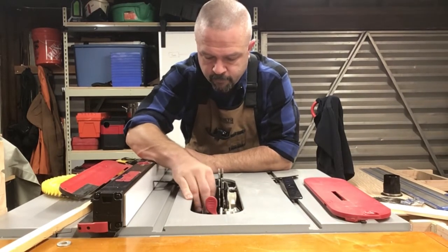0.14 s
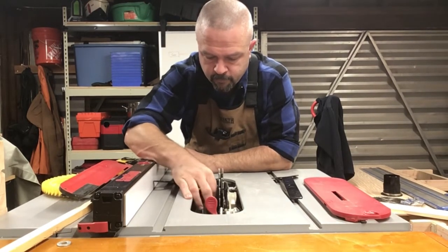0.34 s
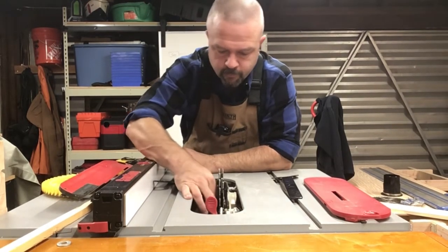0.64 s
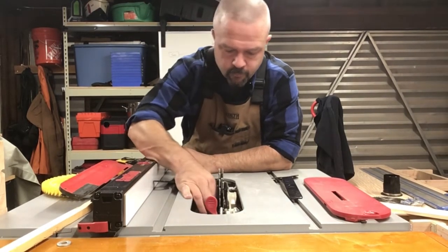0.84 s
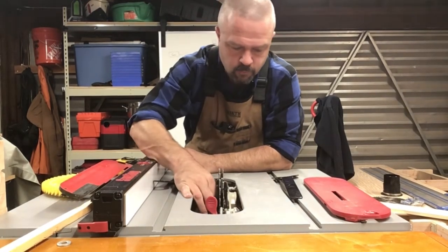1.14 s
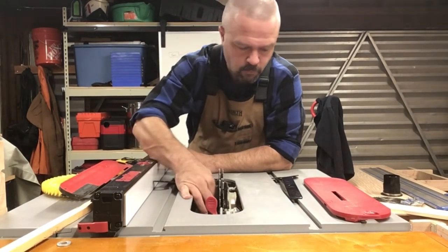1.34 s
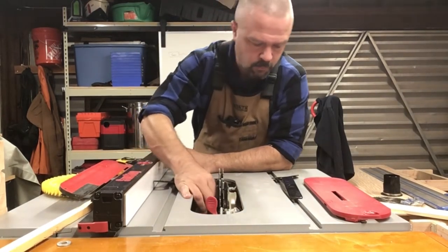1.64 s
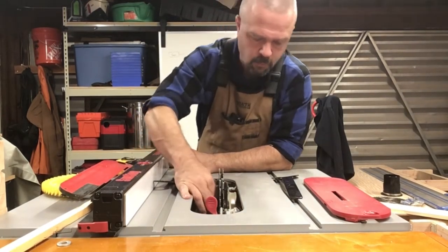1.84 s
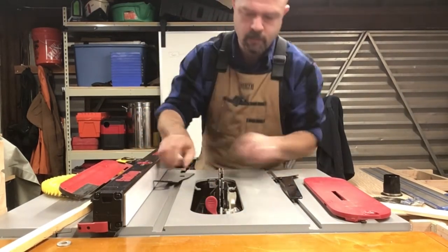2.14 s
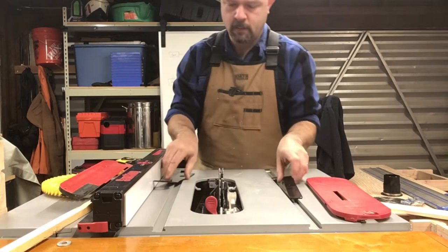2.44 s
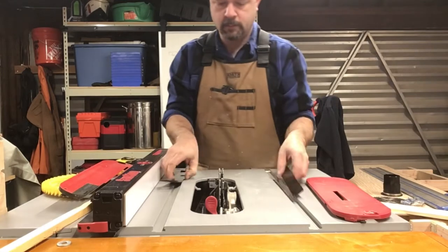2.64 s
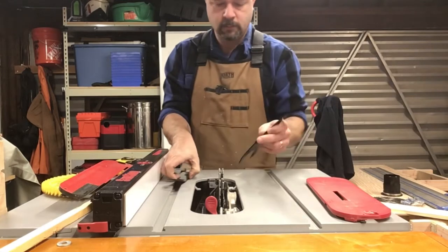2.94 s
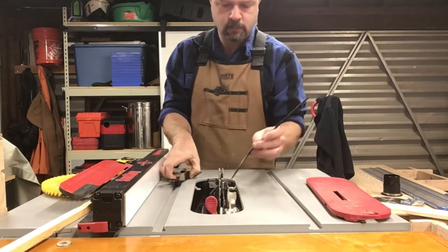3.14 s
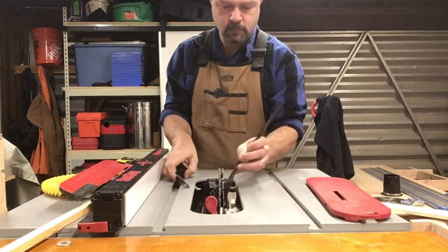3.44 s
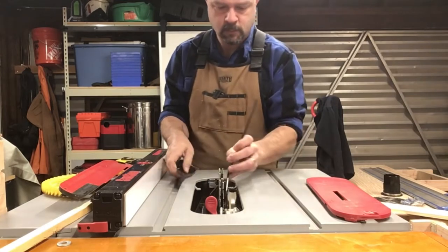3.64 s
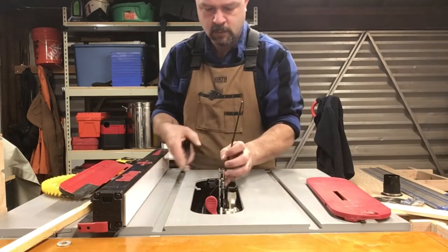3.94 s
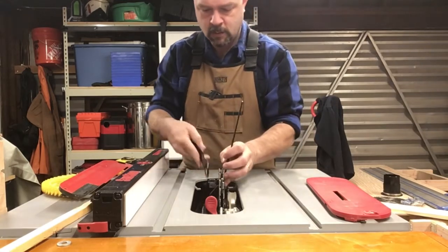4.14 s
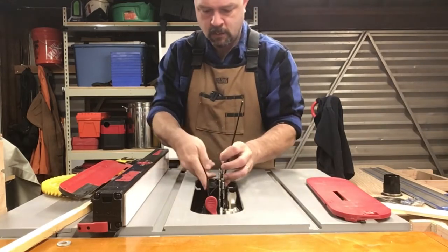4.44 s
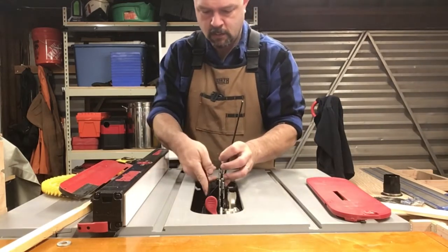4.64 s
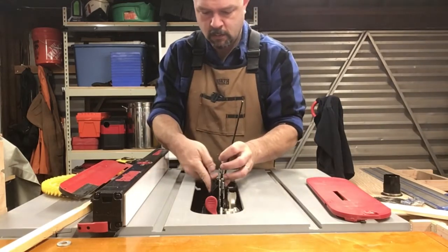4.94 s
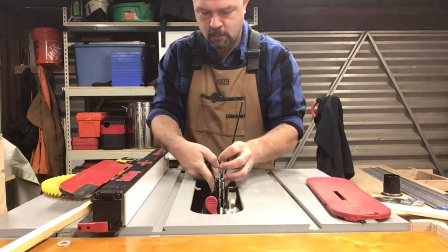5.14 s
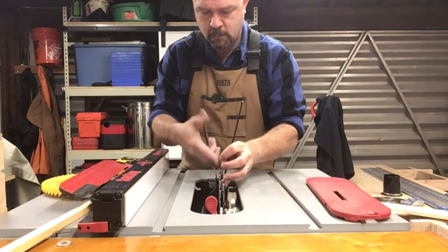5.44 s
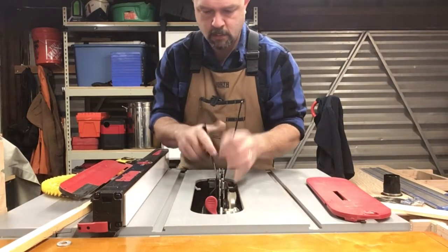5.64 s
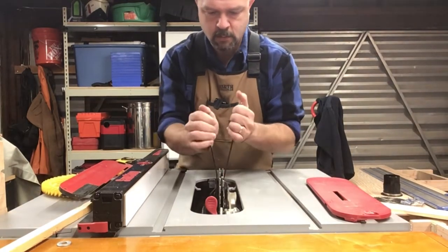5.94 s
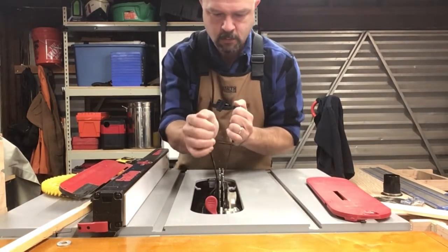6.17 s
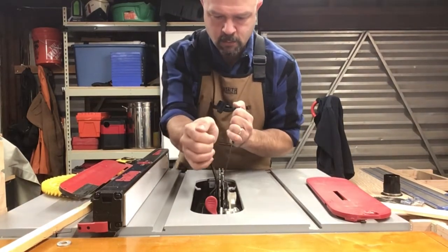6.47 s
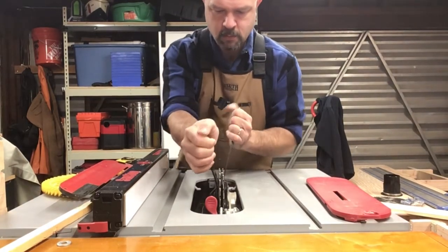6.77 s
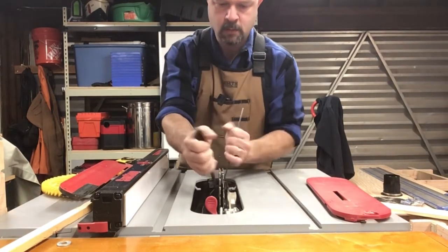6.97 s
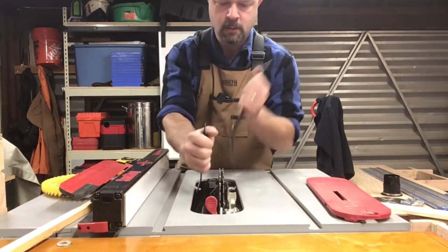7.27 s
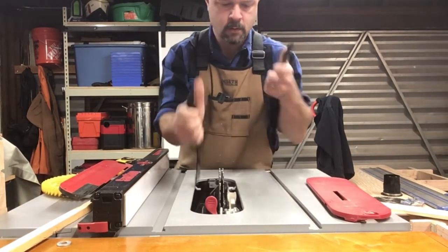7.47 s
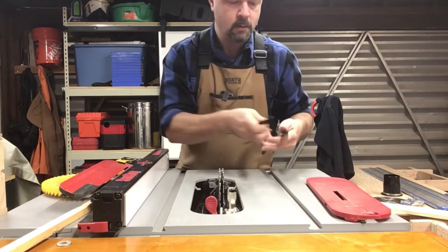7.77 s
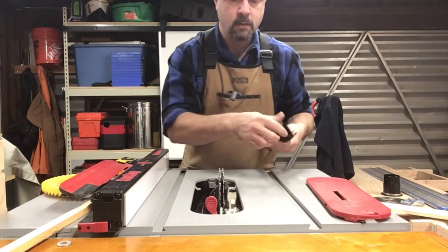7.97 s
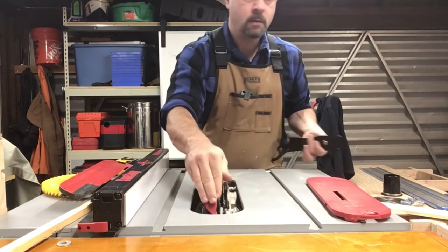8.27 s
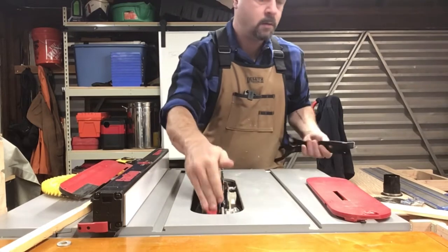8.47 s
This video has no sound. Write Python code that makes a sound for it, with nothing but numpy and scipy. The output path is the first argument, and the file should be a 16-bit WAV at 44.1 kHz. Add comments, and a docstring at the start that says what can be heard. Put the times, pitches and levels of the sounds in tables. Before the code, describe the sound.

Close in a small workshop, hands turn a nut almost silently, with faint clinks and dull taps. Two flat wrenches are then slid off the metal table with knocks and scrapes, and clank hard against the nut, blades and each other. A quieter stretch of pushing and taps brings sharp pops, then more bright clinks as the wrenches are gathered in one hand. Short room echo, low room tone.

```python
"""A small workshop, close to the microphone: hands flick and turn a nut on a saw arbor, with light clinks and dull taps;
from about two seconds two flat steel wrenches are dragged off the table top, then clink on the nut, the blades and
each other, and at the end are gathered in one hand. Sharp pops break in, skin and cloth rub, the room answers.
Bars ring as sums of bending modes; taps, drags and rubbing are shaped noise; pops are short pressure steps."""
import sys
import numpy as np
from scipy import signal
from scipy.fft import rfft, irfft, next_fast_len
from scipy.io import wavfile
from scipy.ndimage import uniform_filter1d, minimum_filter1d

SR = 44100
rng = np.random.default_rng(int(sys.argv[2]) if len(sys.argv) > 2 else 0)


def dump(signal):
    """Clip the signal to [-1, 1] and save it as 16-bit WAV at the path in sys.argv[1]."""
    limited = np.clip(np.atleast_2d(signal).T, -1, 1)
    pcm = np.round(limited * 32767).astype(np.int16)
    wavfile.write(sys.argv[1], SR, pcm)


N = 379701

# resonances of the table top and cabinet: centre_hz, width_hz, level_db
TABLE_MODES = [(141, 70.6, 4), (188.3, 72.7, 4.5), (301, 55, -1.5), (449.5, 101, 2.5), (776, 270, -5.5),
               (1011, 130, -0.5), (1280, 150, 0), (1560, 140, -5.5), (2153, 450, -9.5)]
# bending modes of the long wrench: mode_hz, level_db, t60_s (before strike, chance and grip)
LONG_WRENCH = [(1418, -10, 0.16), (1558, -7, 0.14), (2240, -7, 0.12), (3254, 1.5, 0.11), (4430, -0.5, 0.12),
               (5377, -2, 0.14), (5760, 6.5, 0.099), (6340, -20.5, 0.2), (6820, 9, 0.047),
               (7240, -7.5, 0.1), (7650, 1.5, 0.16), (8710, -1.5, 0.14), (8560, -3, 0.052),
               (9200, -13.5, 0.078), (10130, -5.5, 0.14), (12100, -4.5, 0.22)]
# bending modes of the short wrench: mode_hz, level_db, t60_s (before strike, chance and grip)
SHORT_WRENCH = [(1135, -18, 0.24), (1918, -7.5, 0.097), (2389, -1.5, 0.074), (2803, -2.5, 0.096),
                (2939, -1.5, 0.045), (3884, -1, 0.086), (5124, -1, 0.11), (5270, 1, 0.042),
                (6245, 10.5, 0.053), (6680, -7, 0.15), (7460, -2.5, 0.088), (8100, -7.5, 0.18),
                (8870, -7, 0.13), (9800, -13.5, 0.069), (10900, -14, 0.27), (11100, -16, 0.12),
                (12770, -15.5, 0.12)]


def amp(db):
    """Decibels to gain."""
    return 10 ** (np.asarray(db) / 20)


def unit(x):
    """Scales a sound to rms 1."""
    return x / np.sqrt(np.mean(x ** 2) + 1e-20)


def along(points, hz):
    """Reads a curve of (Hz, value) points on a log frequency axis."""
    point_hz, value = np.transpose(points)
    return np.interp(np.log(hz + 1), np.log(point_hz + 1), value)


def filtered(x, response):
    """Multiplies the spectrum of x by a response that is a function of frequency."""
    size = next_fast_len(len(x) + 8192)
    hz = np.fft.rfftfreq(size, 1 / SR)
    return irfft(rfft(x, size) * response(hz), size)[:len(x)]


def resonant(hz, peaks):
    """Causal response of (centre Hz, width Hz, dB) resonances, summed with alternating sign."""
    total = 0
    for k, (centre, width, db) in enumerate(peaks):
        band = 1j * hz * width / (centre * centre - hz * hz + 1j * hz * width)
        total = total + (-1) ** k * amp(db) * band
    return total


def gritty(grit_db, size):
    """White noise whose strength jumps from grain to grain, each grain size samples long."""
    strength = np.minimum(rng.exponential(size=N // size + 1), 2)
    grains = np.repeat(strength, size)[:N]
    return rng.standard_normal(N) * amp(grit_db * grains)


def add(track, start_s, sound):
    """Lays a sound on the track at its start time."""
    part = track[round(start_s * SR):][:len(sound)]
    part += sound[:len(part)]


def levels(rows):
    """One gain per sample for each dB column of a curve over time."""
    point_s, *columns = np.transpose(rows)
    return [amp(np.interp(np.arange(N) / SR, point_s, column)) for column in columns]


def strokes(starts, holds, dbs, rise, fall):
    """Gain of a set of strokes: each swells to its level, holds and fades, at steady dB per second."""
    t = np.arange(0, N + 64, 64) / SR
    ends = starts + np.abs(holds)
    before = np.maximum(starts[:, None] - t, 0)
    after = np.maximum(t - ends[:, None], 0)
    shape_db = dbs[:, None] - rise * before - fall * after
    return np.interp(np.arange(N) / SR, t, np.linalg.norm(amp(shape_db), axis=0))


def wrenches():
    """Each contact rings both wrenches, rattles the blade stack and shakes the table."""
    # steel on steel: start_s, long_db, long strike point (0-.5), short_db, short strike point (0-.5),
    # contact hardness (octaves from 4 kHz), ring time factor (at least .1 is used), rattle_db, thud_db,
    # the two modes that the grip leaves free: one_hz, other_hz, and how far they stand out: lift_db
    clink_rows = [(0.074, -32.5, 0.33, -38, .099, -1.56, 1, -39.5, -39, 1420, 2925, 2),
                  (0.419, -60, .23, -41, 0.081, -1.57, 0.6, -47, -42.5, 2350, 6530, 10),
                  (2.068, -52, .27, -36, 0.22, -2, 0.66, -40.5, -39.5, 2750, 2810, 5),
                  (3.256, -46.5, 0.058, -49, 0.45, -0.6, 1, -55, -17.5, 2260, 2290, 12.5),
                  (3.314, -28.5, 0.026, -32, .03, -1.56, 0.89, -39, -17, 3877, 2270, 8.5),
                  (3.366, -18.5, .041, -10, 0.049, -2, 0.53, -21.5, -21, 1140, 1410, 6.5),
                  (3.38, -29.5, 0.082, -32.5, .016, -0.3, 0.94, -29.5, -22, 5760, 3316, 4),
                  (3.544, -29, .35, -30.5, 0.38, -0.26, 0.94, -35, -30, 1920, 5630, 9.5),
                  (3.567, -42, .023, -36, 0.31, -0.34, 0.72, -30.5, -33, 1890, 4430, 5.5),
                  (3.63, -35, 0.16, -50.5, 0.34, -2.5, .99, -65, -61, 1400, 1897, 9.5),
                  (3.72, -12.5, .11, -15.5, 0.32, 0.03, 0.92, -8.5, -12.5, 2280, 1400, 9.5),
                  (4.361, -32, .059, -14.5, 0.032, 0.3, 0.5, -26, -38, 2860, 5080, 5.5),
                  (4.555, -39, 0.074, -32.5, .19, -1.27, 1, -40, -45.5, 2920, 6230, 5.5),
                  (4.59, -42, 0.065, -33.5, .19, -1.2, 0.81, -52.5, -48, 1540, 5160, 4.5),
                  (4.694, -18, 0.075, -14.5, 0.18, -0.34, 0.5, -32, -48.5, 2950, 2892, 4.5),
                  (4.703, -15.5, 0.099, -3, 0.2, -1.7, 0.8, -27, -21.5, 2800, 3390, 5),
                  (4.72, -23, .36, 0, 0.19, -0.6, 0.46, -13.5, -22, 5240, 2760, 5),
                  (4.731, -15.5, .48, -3.5, .17, -0.3, .3, -16.5, -14.5, 5110, 2835, 4.5),
                  (4.807, -36.5, .19, -8.5, .18, -0.78, .48, -23.5, -23.5, 2950, 2820, 4),
                  (4.867, -33.5, .035, -23.5, .2, -1.05, 0.48, -44, -23.5, 2892, 2820, 5),
                  (4.904, -12, .3, -4.5, .14, -0.44, 0.66, -11.5, -19, 3752, 7350, 9.5),
                  (6.885, -61, 0.062, -46, 0.021, -1.05, 0.79, -55, -35.5, 2840, 1907, 5.5),
                  (6.913, -28, 0.42, -28.5, 0.03, -1.85, 0.93, -37, -25.5, 1910, 1570, 8),
                  (6.944, -14, .22, -24.5, 0.091, 0.46, 0.64, -18.5, -27, 3270, 5470, 2),
                  (6.959, -33.5, .23, -45.5, .058, 2, 0.82, -47, -25.5, 10300, 7650, 12),
                  (7.113, -48, 0.415, -31.5, 0.03, -0.8, 0.63, -36, -43, 1890, 3220, 7.5),
                  (7.38, -24, 0.043, -7.5, 0.039, -1.25, 0.91, -14, -24, 1900, 6130, 5),
                  (7.841, -17, 0.4, -19, 0.27, -0.49, 1, -35, -36.5, 1555, 8870, 6),
                  (7.867, -17.5, 0.37, -26, 0.21, -1.06, 1, -44, -41, 4420, 2810, 6.5),
                  (7.898, -32, .27, -38, .02, -0.5, 0.86, -18, -36, 6785, 2330, 15),
                  (7.904, -26, 0.098, -22, .17, .74, 0.66, -18.5, -27.5, 5240, 2870, 10),
                  (8.11, -33, .046, -19.5, 0.037, -1.44, 0.71, -25, -21, 2322, 2860, 8.5),
                  (8.211, -23, .22, -21, 0.072, 0.6, 1, -19, -31.5, 1896, 5120, 15),
                  (8.3, -18, .38, -20.5, 0.15, -0.84, 0.64, -26, -36, 3300, 6060, 9.5),
                  (8.366, -36, 0.26, -33, .35, -0.6, 1, -29.5, -55, 2312, 5020, 20),
                  (8.445, -20, .27, -17, .28, -0.3, 1, -25, -33.5, 8560, 5040, 8),
                  (8.491, -47, .022, -28, 0.12, -0.3, 1, -47, -30.5, 4900, 3330, 5),
                  (8.598, -31, .046, -27, .046, -2.1, .9, -31.5, -22.5, 2400, 2310, 13)]
    # colour of the rattling blade stack: point_hz, level_db per Hz (relative)
    clatter_colour = [(180, -28.5), (300, 4), (789, -5.5), (1080, -5), (4120, -1.5), (5200, -1.5),
                      (8860, -10), (15100, -28.5), (16200, -49.5)]
    contact_ms, softer_longer = 1.7, 0.39  # rise at 4 kHz hardness; octaves longer per octave softer
    out, t = np.zeros(N), np.arange(SR // 4) / SR
    for (start_s, long_db, long_at, short_db, short_at, octaves, factor, rattle_db, thud_db,
         one_hz, other_hz, lift_db) in clink_rows:
        centre_hz = 4000 * 2 ** octaves
        grip = [one_hz, lift_db, other_hz, lift_db]

        def contact(hz):
            """A harder contact moves the band of excitation up in frequency."""
            bell = 1 / (1 + (1.094 * np.log((hz + 1) / centre_hz)) ** 2)
            return bell / (1 + (hz / (4.4 * centre_hz)) ** 2)

        bars = amp(long_db) * ring(LONG_WRENCH, t, long_at, factor, contact, grip)
        bars += amp(short_db) * ring(SHORT_WRENCH, t, short_at, factor, contact, grip)
        noise = rng.standard_normal(len(t))
        rattle = unit(filtered(noise, lambda hz: amp(along(clatter_colour, hz)) * contact(hz) ** 0.76))
        # a long weak tail and a short strong burst
        rattle_fade = 0.69 * amp(-60 * t / (0.19 * max(factor, .1))) + 4.07 * amp(-60 * t / 0.013)
        rattle = amp(rattle_db) * rattle * rattle_fade
        rise = 1 - np.exp(-t * 1000 / (contact_ms * 2 ** (-softer_longer * octaves)))
        add(out, start_s, rise * (bars + rattle) + amp(thud_db) * thud(t, t60=0.093))
    return out


def ring(modes, t, point, factor, contact, grip):
    """A flat bar: the strike point sets each mode's drive; the grip sets ring time but favours two modes."""
    hz, db, t60 = np.transpose(modes)[:, :, None]
    number = np.arange(1, len(modes) + 1)[:, None]
    drive = np.abs(np.cos(np.pi * number * point)) + .1
    lift_db = 0
    for free_hz, lift in np.reshape(grip, (2, 2)):
        lift_db = lift_db + lift * np.exp(-(np.log(hz / free_hz) / 0.045) ** 2)
    life = t60 * max(factor, .1) * amp(0.43 * lift_db)
    chance = rng.standard_normal((len(modes), 6))
    # a faint second decay lasts three times as long
    fade = amp(db + lift_db + chance[:, :1]) * (amp(-60 * t / life) + 0.026 * amp(-60 * t / (3 * life)))
    # twin modes beat
    beat = 1 + 0.79 * np.cos(2 * np.pi * (45 * chance[:, 2:3] * t + chance[:, 3:4]))
    # loose contact blurs each line
    beat += 0.67 * np.cos(2 * np.pi * (130 * chance[:, 4:5] * t + chance[:, 5:]))
    tone = np.sin(2 * np.pi * (hz * t + chance[:, 1:2]))
    return np.sum(drive * contact(hz) * fade * beat * tone, axis=0)


def thud(t, t60):
    """A short push into the table and cabinet: a decaying noise burst through their resonances, peak 1."""
    push = rng.standard_normal(len(t)) * amp(-60 * t / t60)
    body = filtered(push, lambda hz: resonant(hz, TABLE_MODES) / (1 + 1j * hz / 700))
    return body / np.abs(body).max()


def dragging():
    """Sliding steel grates in the table's resonances, with wrench modes singing in the bright part."""
    # steel dragged over the table top: start_s, hold_s, level_db, brightness_db (relative to level_db)
    drag_rows = [(1.994, .05, -63, -10), (2.074, 0.083, -44.5, -9), (2.158, 0.077, -53, -9),
                 (2.246, 0.04, -38.5, -2.5), (2.343, .07, -51, -18), (2.438, 0.025, -40, -1.5),
                 (2.543, 0.015, -31, -9.5), (2.626, 0.0078, -37.5, -5), (2.681, 0.082, -44, -8.5),
                 (2.857, .01, -39, -8.5), (2.961, 0.027, -41, -4), (3.044, 0.0058, -48.5, -21),
                 (3.282, .1, -26, -5), (3.375, 0.094, -30, -2.5), (3.55, 0.02, -44.5, -9.5),
                 (3.635, 0.1, -53.5, -7), (4.555, .04, -46, -7.5), (4.689, .005, -45.5, 3),
                 (4.723, .03, -38, -10), (4.815, .01, -34, -12.5), (4.868, 0.026, -35, -7),
                 (5.303, 0.032, -56.5, -7.5), (5.49, .005, -59, 3), (5.593, .005, -48, 2),
                 (5.749, .03, -52.5, -13), (5.821, 0.059, -56.5, -4.5), (6.893, 0.023, -48, -13),
                 (6.94, 0.0099, -34, -2), (7.131, 0.023, -40, -14.5)]
    rise, fall = 601, 302  # dB per second
    start_s, hold_s, db, bright_db = np.transpose(drag_rows)
    dull_gain = strokes(start_s, hold_s, db, rise, fall)
    bright_gain = strokes(start_s, hold_s, db + bright_db, rise, fall)

    def dull_colour(hz):
        """Low table resonances."""
        return resonant(hz, TABLE_MODES[2:5]) * hz / (hz + 200) / (1 + (hz / 1500) ** 2)

    def bright_colour(hz):
        """High table resonances."""
        return resonant(hz, TABLE_MODES[5:]) * hz / (hz + 900) / (1 + (hz / 3500) ** 2)

    dull = unit(filtered(gritty(3.7, size=300), dull_colour))
    bright = unit(filtered(gritty(2.4, size=200), bright_colour))
    # wrench modes as resonances 35 Hz wide
    narrow = [(hz, 35, level) for hz, level, _ in LONG_WRENCH[2:7] + SHORT_WRENCH[3:7]]
    sing = unit(filtered(gritty(3.3, size=400), lambda hz: resonant(hz, narrow) / (1 + (hz / 2400) ** 2)))
    return dull_gain * dull + bright_gain * (bright + amp(-11) * sing)


def taps():
    """A puff of noise around its pitch over a thud, with no ring, led by a bright tick."""
    # dull taps and ticks of hands, nut and table: start_s, puff peak_db, thud_db (relative to puff), pitch_hz
    tap_rows = [(0.321, -49, -22, 2340), (0.369, -46, -18, 945), (1.446, -44.5, -2, 2140),
                (1.484, -44.5, -15, 690), (1.612, -43.5, -14, 880), (1.997, -49, 13, 829),
                (2.029, -45.5, 8.5, 745), (2.259, -26, 3, 1080), (2.306, -30.5, 4, 1020),
                (2.335, -33.5, 9.5, 1300), (2.454, -23.5, -7, 740), (3.02, -47, 7, 980),
                (3.062, -41.5, -13, 1090), (3.929, -33, 0, 1150), (3.934, -37, -25, 3370),
                (4.025, -50, -17, 2500), (4.115, -48, -10, 1210), (4.3, -54, -20, 6500),
                (4.337, -61, -23, 6050), (5.309, -40, 5, 1125), (5.364, -41.5, 5.5, 1120),
                (5.484, -35, -12, 1573), (5.516, -38.5, -1, 767), (5.587, -28, -26, 765),
                (5.754, -33.5, 3.5, 1624), (5.776, -37.5, -7, 817), (5.816, -37, -10, 732),
                (6.147, -47, -20.5, 6000), (6.219, -50, -15, 1424), (6.691, -36, 4, 920),
                (6.779, -38, -28.5, 5560), (6.899, -39.5, -5, 1858), (7.135, -36.5, 15, 807),
                (8.596, -22, -23.5, 2510)]
    puff_t60_s, thud_t60_s, tick_db = 0.013, .075, -16
    out, t = np.zeros(N), np.arange(SR // 5) / SR
    for start_s, db, thud_db, pitch_hz in tap_rows:
        noise = rng.standard_normal(len(t))
        puff = noise * amp(-60 * t / puff_t60_s) * (1 - np.exp(-t / 0.0031))
        puff = filtered(puff, lambda hz: resonant(hz, [(pitch_hz, .7 * pitch_hz, 0)]) ** 2)
        puff /= np.abs(puff).max()
        tick = amp(tick_db) * noise * amp(-60 * t / 0.0034)
        add(out, start_s, amp(db) * (puff + tick + amp(thud_db) * thud(t, thud_t60_s)))
    return out


def pops():
    """A crackling push of air that swings back slowly."""
    # sharp pops, one pressure step each: start_s, level_db, width_ms, crackle (0-1), swing back t60_s
    pop_rows = [(1.768, -25, 0.91, 1, 0.037), (6.3337, -17, 0.61, 0.75, 0.023),
                (6.706, -22, 0.76, 0.4, 0.022), (7.528, -22, .2, 0.8, .01), (7.546, -22.5, 0.35, 0.9, .015),
                (7.618, -21.5, 0.32, 1, 0.034), (8.3401, -6.5, 0.33, 0.36, 0.026)]
    out, t = np.zeros(N), np.arange(SR // 10) / SR
    for start_s, db, width_ms, crackle, t60 in pop_rows:
        u = t * 1000 / width_ms
        rough = 1 + crackle * uniform_filter1d(rng.standard_normal(len(t)), size=3)
        step = (1 - 0.65 * u) * np.exp(-u / 1.98) * rough
        swing = 0.13 * amp(-60 * t / t60) * np.sin(2 * np.pi * 170 * t)
        add(out, start_s, amp(db) * (1 - np.exp(-t / .00007)) * (step - swing))
    return out


def handling():
    """Leaning and shuffling thump in the cabinet; skin and cloth hiss."""
    # hands at work all along: point_s, thumps and shuffling thump_db, rubbing of skin and cloth rub_db
    hand_curve = [(0, -70, -75.5), (1.75, -74, -67), (1.9, -50.5, -54), (2.56, -47, -44), (2.85, -53, -52),
                  (3.05, -55, -55.5), (3.2, -60, -62.5), (3.44, -56, -42.5), (3.56, -60, -47),
                  (4.04, -53.5, -52.5), (4.4, -58, -60.5), (5.1, -52, -57), (5.4, -53, -58),
                  (5.73, -45.5, -49.5), (5.86, -49, -54), (6.4, -56.5, -59), (6.9, -54, -56),
                  (7.9, -54, -55), (8.61, -44, -46)]
    # single moves of a hand, flicks at the nut and pushes on the table: start_s, hold_s, thump_db, rub_db
    move_rows = [(0.083, 0.046, -41.5, -51.5), (0.38, .01, -67, -66), (0.425, 0.016, -59, -61),
                 (0.46, .14, -57.5, -62), (0.69, 0.04, -55, -57), (0.902, 0.025, -60, -63),
                 (1.088, 0.041, -63, -61.5), (1.268, .04, -60, -64), (1.433, 0.15, -60, -60.5),
                 (1.61, .02, -56.5, -80), (1.763, 0.0021, -49, -61), (1.962, 0.06, -53, -78),
                 (2.214, .08, -37.5, -51), (3.447, .02, -39, -44), (3.755, 0.036, -33.5, -44.5),
                 (4.767, .03, -38, -44), (4.953, 0.018, -38.5, -62), (7.02, 0.048, -60, -53),
                 (7.449, 0.087, -50, -53), (8.046, 0.046, -55, -60)]
    # colour of skin and cloth: point_hz, level_db per Hz (relative)
    rub_colour = [(350, -33.5), (600, 0), (1160, -7.5), (1300, -5), (1810, -11), (2130, -8.5), (2480, -9),
                  (4300, -9), (10300, -25), (16200, -41.5)]
    start_s, hold_s, *columns = np.transpose(move_rows)
    moves = [strokes(start_s, hold_s, db, rise=700.5, fall=352) for db in columns]
    thump_gain, rub_gain = np.hypot(levels(hand_curve), moves)
    thump = filtered(gritty(4.2, size=500), lambda hz: resonant(hz, TABLE_MODES[:4]) / (1 + (hz / 300) ** 2))
    rub = filtered(gritty(4.0, size=40), lambda hz: amp(along(rub_colour, hz)))
    return thump_gain * unit(thump) + rub_gain * unit(rub)


def walls(x, decays, size):
    """A fresh decaying tail for each stretch of sound; each frequency dies at its own speed."""
    out = np.zeros(N)
    for start in range(0, N, size):
        hz, t, z = signal.stft(rng.standard_normal(SR // 2), SR, nperseg=256)
        fade = amp(-60 * t / along(decays, hz)[:, None])
        tail = signal.istft(z * fade, SR, nperseg=256)[1]
        echo = signal.fftconvolve(x[start:start + size], tail / np.linalg.norm(tail))
        add(out, start / SR + 0.0036, echo)
    return out


def air():
    """The steady tone of the room: noise in a fixed colour."""
    # room tone: point_hz, level_db per Hz (relative)
    air_colour = [(12, -45), (20, -15), (38, -0.5), (146, 4.5), (390, -6.5), (515, -15.5), (1230, -17),
                  (1720, -17.5), (2270, -16), (2470, -24), (6410, -23.5), (14900, -37.5), (16200, -46.5)]
    air_db = -58
    return amp(air_db) * unit(filtered(rng.standard_normal(N), lambda hz: amp(along(air_colour, hz))))


def scene():
    """Near sources, their near and late echo, the handling and the room tone."""
    # decay of the near walls: point_hz, t60_s
    near_decays = [(150, .35), (1000, 0.17), (4000, 0.27), (12000, 0.22)]
    # decay of the far end of the shop: point_hz, t60_s
    far_decays = [(150, .6), (1000, .5), (4000, .6), (12000, 0.72)]
    near_db, far_db = -14, -27.5
    near = wrenches() + taps() + pops() + dragging()
    echo = amp(near_db) * walls(near, near_decays, size=9000)
    echo += amp(far_db) * walls(near, far_decays, size=30000)
    return (near + echo + handling() + air())[None]


def record(dry):
    """A faint treble hiss rises for a while after loud sound; the loudest blows overload."""
    gate_db, gate_hold_s, hiss_db = -30, .36, -66.5
    ceiling, top_hz = .97, 15900
    level = np.sqrt(np.abs(uniform_filter1d(dry[0] ** 2, 512)))
    hold = round(gate_hold_s * SR)
    # a running maximum over the past keeps the gate open
    loud = -minimum_filter1d(-1. * (level > amp(gate_db)), hold, origin=(hold - 1) // 2)
    hiss = unit(filtered(rng.standard_normal(N), lambda hz: 1 / (1 + (5000 / (hz + 1)) ** 4)))
    # low cut at 35 Hz
    heard = filtered(dry[0], lambda hz: (1j * hz / (35 + 1j * hz)) ** 2)
    heard += amp(hiss_db) * uniform_filter1d(loud, 256) * hiss
    clipped = heard / (1 + np.abs(heard / ceiling) ** 8) ** (1 / 8)
    return filtered(clipped, lambda hz: hz < top_hz)[None]


dry = scene()
out = record(dry)
dump(out)
```